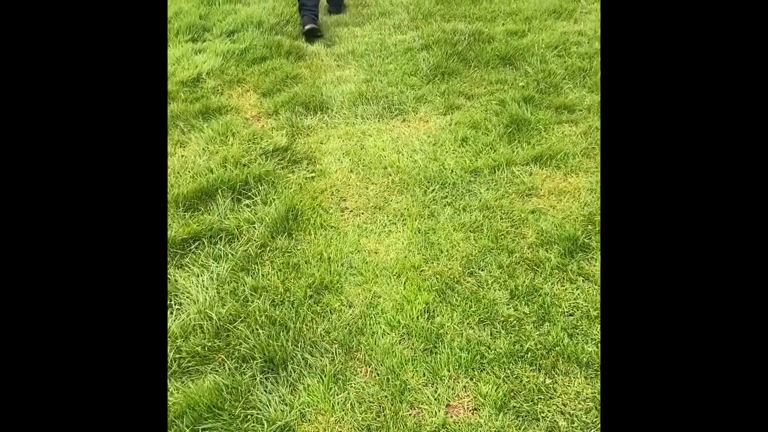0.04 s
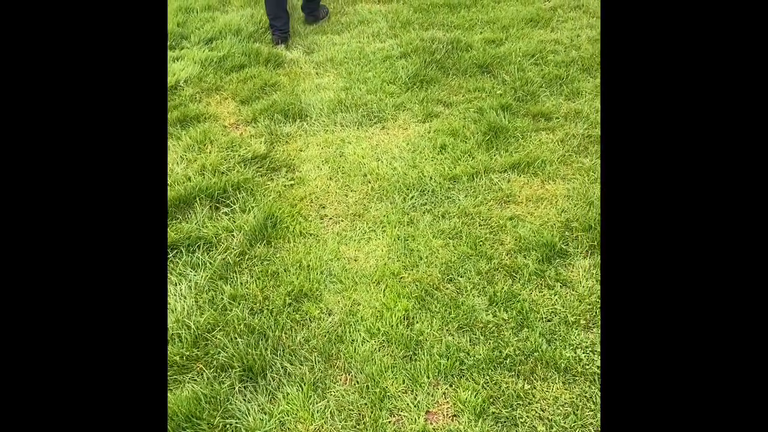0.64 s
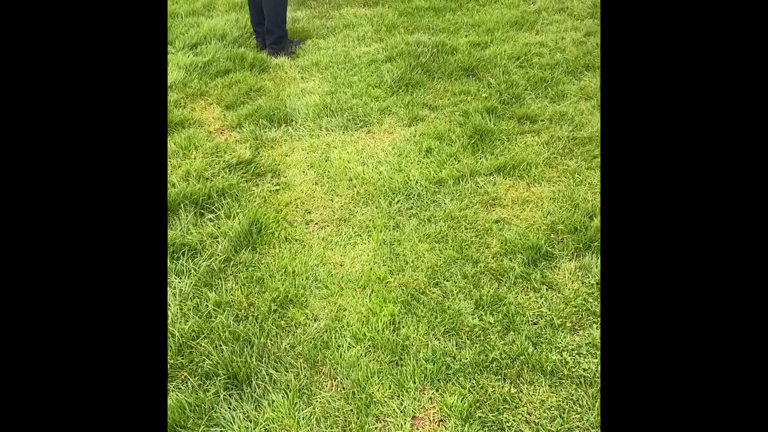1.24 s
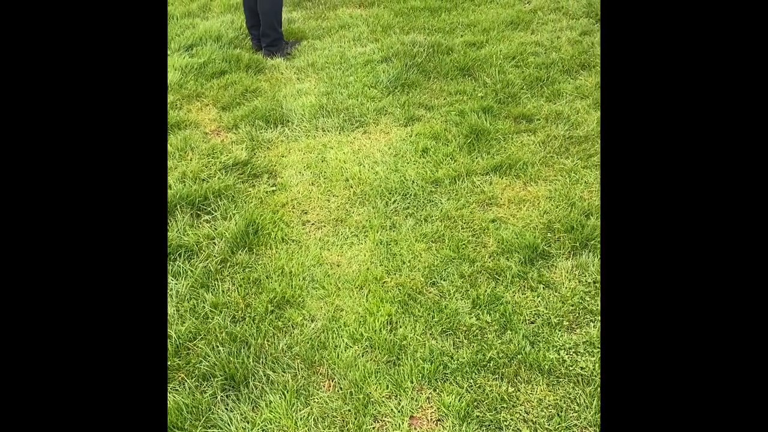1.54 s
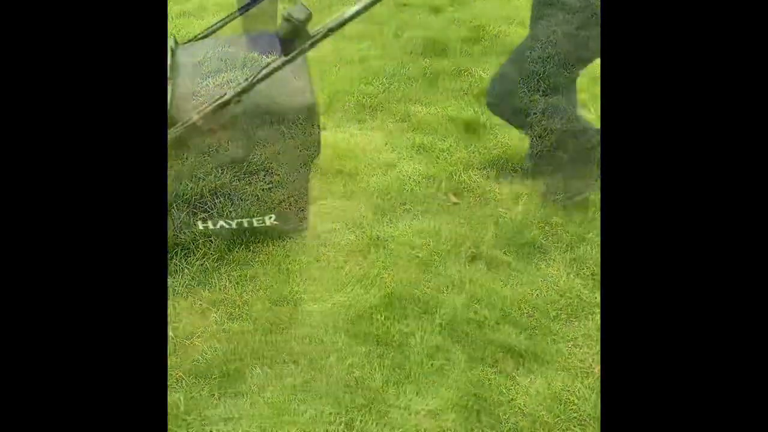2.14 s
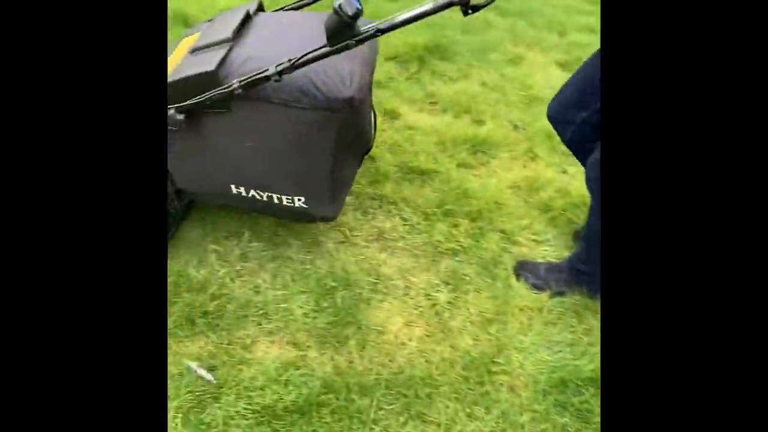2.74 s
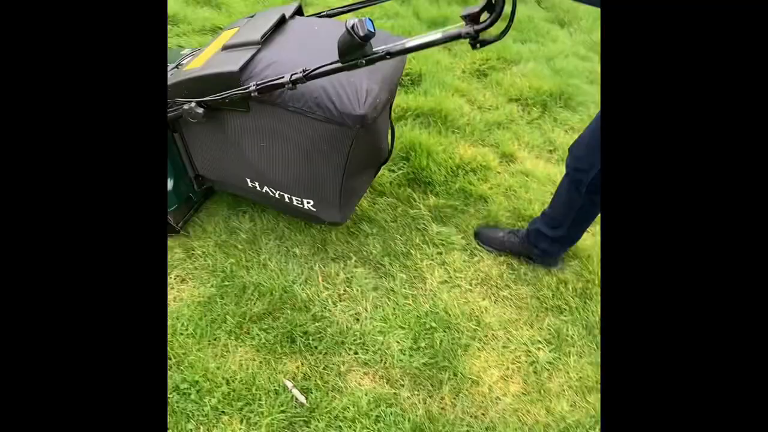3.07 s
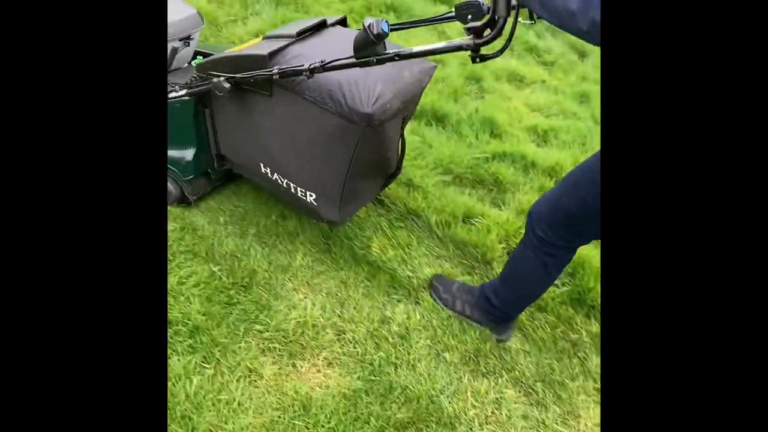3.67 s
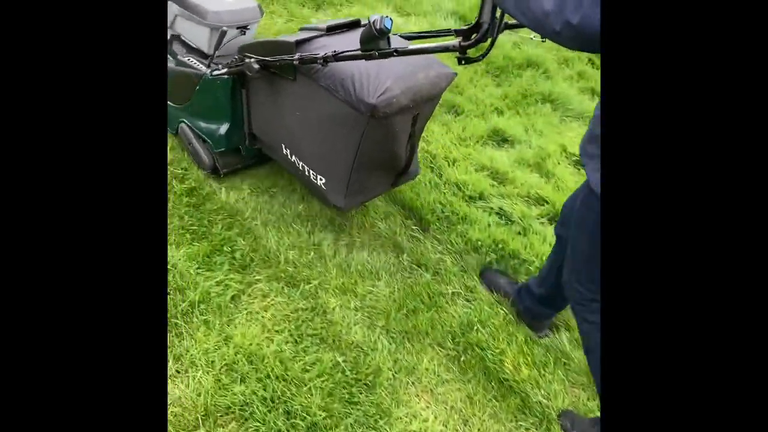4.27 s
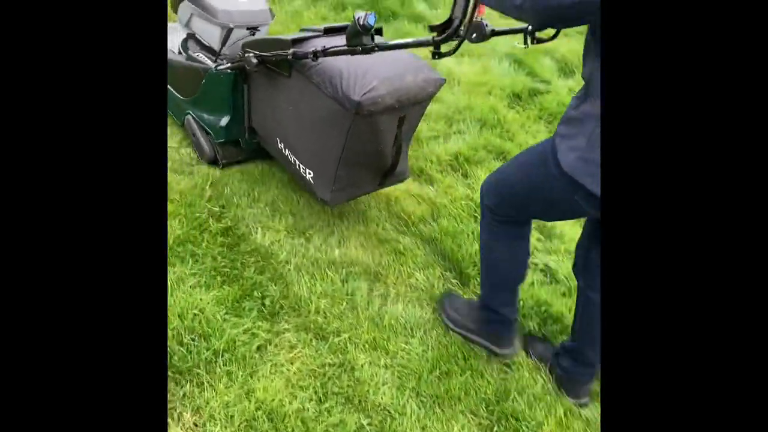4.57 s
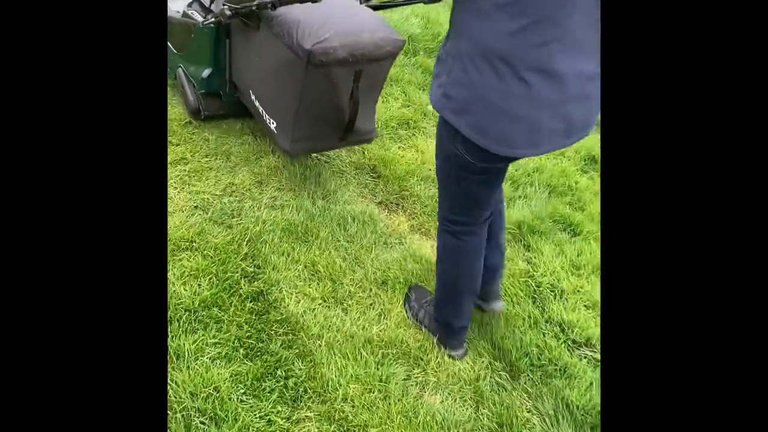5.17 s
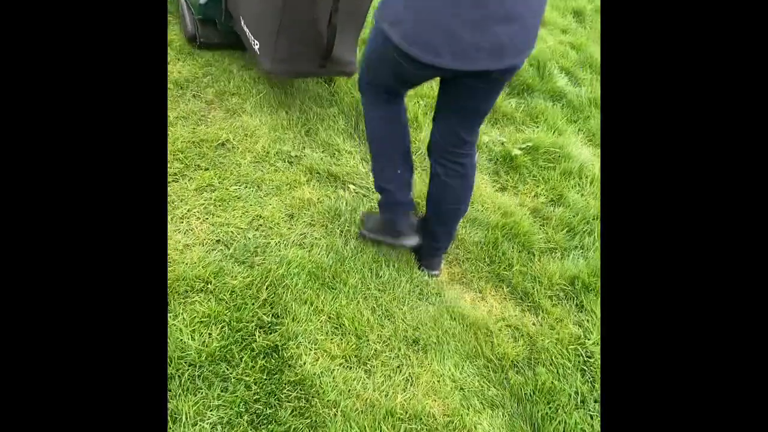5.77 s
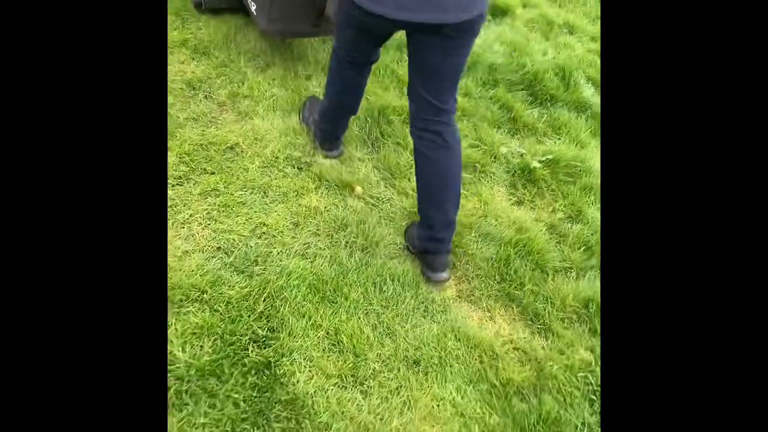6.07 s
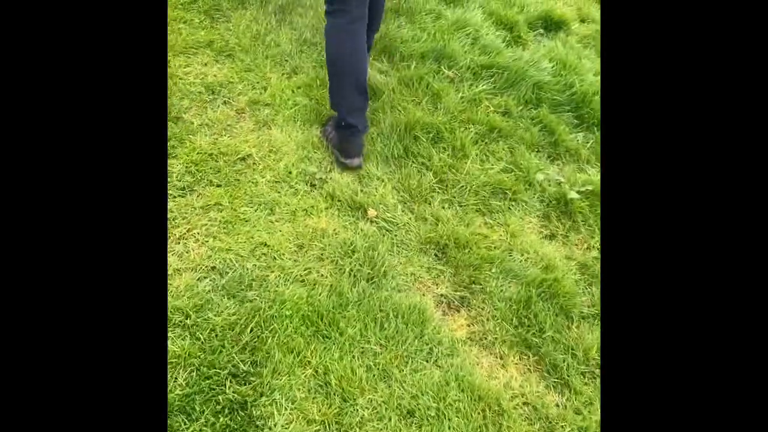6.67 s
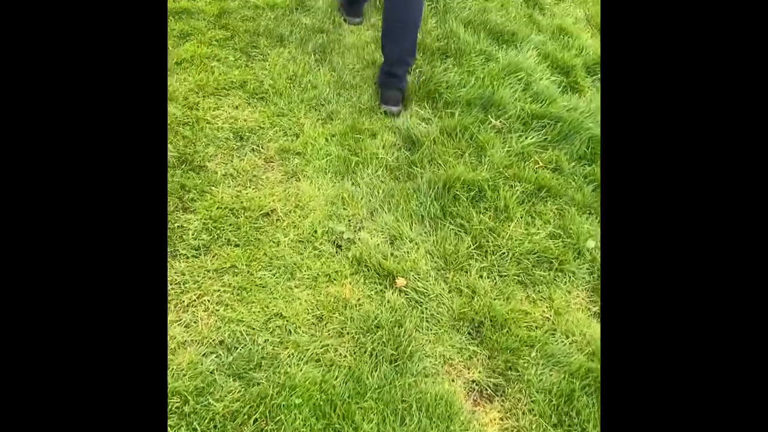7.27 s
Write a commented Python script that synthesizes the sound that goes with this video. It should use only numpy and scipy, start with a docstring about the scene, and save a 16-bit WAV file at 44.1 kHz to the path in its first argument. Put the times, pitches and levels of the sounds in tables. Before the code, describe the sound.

A battery lawnmower hums faintly across an open lawn with no echo, lightly rasping through grass. At about 1.1 seconds it is switched off and its hum falls in pitch with a soft shudder. From about 1.6 seconds a second pass fades in, becoming close and much louder by 2.5 seconds: a steady, slightly wavering low hum with chopped rushing air and a cutting hiss. A thin, rough wheel-drive whine peaks near 3 seconds and returns more faintly around 6.3. The blade rasps through thicker grass around 3, 5 and 6.3 seconds. Swishes of grass, probably footsteps, come irregularly from 2.5 seconds on. Flung bits tick against the deck near 3 seconds and again from 5.8 to 6.6, and tiny bright stalk cracks appear from 3.6 onward. After about 5.5 seconds the mower recedes slightly, still running at the end, around 7.3 seconds.

```python
"""A battery lawnmower on an open lawn, heard through a pair of microphone ports, with no echo.
Far off it hums, is switched off and coasts down; a second pass fades in close by and moves away.
The two blade tips make the hum, chop the air rushing through the deck and cut with a steady hiss.
Over it come swishes of grass, probably footsteps. Stalks crack, flung bits tick against the deck,
and the wheel drive adds a thin whine."""
import sys
import numpy as np
from scipy import signal
from scipy.fft import rfft, irfft
from scipy.io import wavfile

SR = 44100
rng = np.random.default_rng(int(sys.argv[2]) if len(sys.argv) > 2 else 0)


def materialize(psi):
    """Save the field psi as 16-bit PCM at rate SR to the path in sys.argv[1].

    A 1-D psi becomes a single channel; in a 2-D psi each row is a channel.
    """
    bounded = np.clip(np.atleast_2d(psi).T, -1, 1)
    quanta = np.round(bounded * 32767).astype(np.int16)
    wavfile.write(sys.argv[1], SR, quanta)


N = 322812
TIME = np.arange(N) / SR
FREQS = np.maximum(np.arange(N // 2 + 1) * SR / N, 1)
RUN_HZ = 90.7   # blade passes per s of the distant mower under power
CUTOFF_HZ = 15750   # top of the microphone's range

# close by, the blade sags in thick grass and recovers: t/s, blade passes/Hz
BLADE_SPEED = [(1.7, 85.6), (2.23, 87.6), (2.25, 88.3), (2.42, 88.3), (2.45, 87.4), (2.94, 86.6),
               (3.17, 89.1), (3.94, 90.4), (4.17, 91.4), (4.84, 89.2), (5.44, 90.4), (5.72, 89.4),
               (6.55, 89.0), (7.32, 90.3)]


def close_pass():
    """Tones and noise of the mower cutting past the microphone: approaching, side on, then from behind."""
    # the hum's first three harmonics, swelling and fading irregularly: t/s, level/dB
    fundamental = [(1.7, -46), (1.73, -39), (1.98, -32.5), (2.15, -30.5), (2.37, -24), (2.62, -26.5),
                   (3.22, -25), (3.34, -32), (3.42, -24), (3.89, -22), (4.42, -24.5), (4.71, -23),
                   (7.21, -31), (7.32, -30)]
    second = [(1.7, -45.5), (1.84, -36), (2.51, -26.5), (2.59, -34.5), (2.67, -24.5), (2.9, -32.5),
              (2.97, -56), (3.01, -33), (3.14, -23), (4.69, -27.5), (4.81, -37), (5.02, -23), (5.11, -33),
              (5.57, -28), (5.66, -42), (5.78, -21.5), (5.96, -29.5), (6.52, -28.5), (6.8, -38.5),
              (7.01, -27), (7.15, -37), (7.32, -23)]
    third = [(1.7, -50), (1.93, -45), (1.95, -37.5), (2.15, -32.5), (2.23, -48), (2.42, -26.5),
             (2.47, -35.5), (2.65, -28), (2.75, -36), (2.81, -23), (3.11, -28), (3.17, -35), (3.23, -24.5),
             (3.61, -39), (3.67, -20), (3.8, -40), (3.87, -27.5), (3.91, -35.5), (4.02, -31), (4.16, -43),
             (4.2, -23), (4.36, -37.5), (4.39, -24), (4.53, -39.5), (4.64, -24.5), (4.69, -38),
             (4.75, -25.5), (4.84, -32), (5.05, -26), (5.13, -44), (5.19, -27), (5.57, -31), (5.64, -27),
             (5.69, -56), (5.82, -25.5), (5.89, -42.5), (6.32, -31), (6.46, -39), (6.58, -26.5),
             (6.93, -32.5), (6.97, -46), (7.04, -31), (7.16, -48.5), (7.32, -30)]
    # air rush as the mower comes close and moves off: t/s, level/dB
    air_level = [(1.7, -51.5), (1.93, -44), (2.5, -32.5), (3.26, -30.5), (4.03, -32), (5.22, -31),
                 (6.76, -35), (6.99, -34), (7.32, -36.5)]
    # air rush from four angles, each notched differently by the ground bounce: f/Hz, level/dB
    approach = [(55.0, -3), (130.0, 1), (270.0, 5), (430.0, -7), (600.0, -10.5), (780.0, -11.5), (900, -5),
                (1010.0, -1.5), (1120, -5.5), (1400, -9.5), (1900.0, -21), (2130, -18), (2400.0, -18),
                (3500.0, -22.5), (5500.0, -36.5), (9500.0, -38), (15500.0, -51)]
    beside = [(55.0, -8), (130.0, -2), (270.0, 1.5), (380.0, -8.5), (580.0, -9), (750.0, -6), (930.0, -7),
              (1130.0, -5), (1290, -10), (1500, -12.5), (1720.0, -18), (1950, -17), (2700.0, -21),
              (3150, -21), (3500.0, -21.5), (5500.0, -31.5), (9500.0, -31.5), (15500.0, -40)]
    rear_quarter = [(55.0, -10), (250.0, 2.5), (380.0, -13.5), (560.0, -9), (720.0, 0), (920.0, -7),
                    (1150.0, -6.5), (1650.0, -15), (2200, -18.5), (2900.0, -17), (3600.0, -22),
                    (5000.0, -28), (9500.0, -30.5), (15500.0, -41)]
    behind = [(55.0, -8), (250.0, 3), (350.0, -8), (560.0, -12), (720.0, 1), (940.0, -15), (1130.0, -2),
              (1400, -21), (1580.0, -24), (1850, -18.5), (2250.0, -17), (3000.0, -21), (3600.0, -25.5),
              (5500.0, -29), (9500.0, -30.5), (15500.0, -38.5)]
    # when each of the spectra below faces the microphone: t/s, lift of the rush/dB
    aspects = [(2.1, 7), (2.9, 5), (4.1, 5.5), (5.4, 6.5), (6.6, 6)]
    spectra = [approach, beside, beside, rear_quarter, behind]

    (pass_hz,), (air_db,) = in_time(BLADE_SPEED), in_time(air_level)
    passes = np.cumsum(pass_hz) / SR
    levels_db = [in_time(harmonic)[0] + 6.5 for harmonic in (fundamental, second, third)]
    tones = hum(passes, levels_db, waver_db=[.35, 1.0, 1.4], sway=0.16, waver_hz=9)
    tones += from_db(air_db + 2.5) * whine(passes, pass_hz, jitter=0.003, motor_db=0)
    noise = deck_rumble(passes, level_db=air_db - 7.5, gust_db=1.5, gusts_per_s=1.7)
    air = chopped(passes, blade_db=1.17, shaft_db=0, flutter_db=1.22, buzz=0.22)
    air += rattle(level_db=-12.5, per_s=900, ring_s=0.021, low_hz=649.8, high_hz=3494)
    # stalks snap in tiny clumps as a tip sweeps through them, a little before it reaches the chute
    snaps = chopped(passes + 0.22, blade_db=1.0, shaft_db=0.25, flutter_db=0.93)
    snaps *= from_db(1.4 * drift(700))
    grass = grass_envelope(steady_db=2.0, swish_db=0.5)
    times, lifts_db = np.transpose(aspects)
    for spectrum, lift_db, share in zip(spectra, lifts_db, np.eye(len(aspects))):
        rush = from_db(air_db + lift_db) * through_deck(air, spectrum, "rush")
        hiss = grass * through_deck(snaps, spectrum, "hiss")
        noise += np.interp(TIME, times, share) * (rush + hiss)
    fade_in = np.interp(TIME, [1.5, 1.7], [0, 1])
    return fade_in * tones, fade_in * noise


def far_pass():
    """Tones and noise of the distant mower; each layer falls with tip speed by its own law."""
    # deck resonances that the hum glides through: f/Hz, level/dB
    hum_response = [(48, -35), (53, -42), (62, -38), (71, -34), (80, -53), (86, -37), (90, -32.5),
                    (105, -42), (123, -48), (135, -34), (160, -36), (174, -29.5), (181, -31.5),
                    (195, -38.5), (245, -43), (272, -56)]
    # air rush from across the lawn: f/Hz, level/dB
    spectrum = [(55.0, 2), (110, 3), (250.0, 2.5), (340.0, -6.5), (570.0, -8), (700.0, -3.5), (850, -5),
                (990.0, -12), (1200.0, -5), (1300, -9.5), (1400, -14), (1550, -19), (1780.0, -18),
                (2050, -18.5), (2280, -18.5), (2650, -16.5), (2900, -20.5), (3400.0, -19), (3600, -32.5),
                (4400.0, -26.5), (5200.0, -26.5), (6000.0, -26.5), (9500.0, -28), (15500.0, -38)]
    pass_hz = coasting_speed()
    passes = np.cumsum(pass_hz) / SR
    slowing = np.log10(pass_hz / RUN_HZ)   # decades of speed, negative as the blade coasts
    air_db, hiss_db, hum_db = 57 * slowing, 31 * slowing, 61 * slowing
    levels_db = [at_hz(hum_response, k * pass_hz) + hum_db + 7.5 for k in (1, 2, 3)]
    shake = 1 - 6.6 * slowing   # the slower, the less steady
    tones = hum(passes, levels_db, waver_db=[.3 * shake, shake, 2.2], sway=0.13 * shake, waver_hz=18)
    # the overtones sink with the air rush while the motor lines hold their level
    tones += from_db(air_db - 39) * whine(passes, pass_hz, jitter=0.0061, motor_db=-air_db - 3.5)
    air = chopped(passes, blade_db=0.5, shaft_db=-1.05, flutter_db=1.4, buzz=0.33)
    rush = from_db(air_db - 36) * through_deck(air, spectrum, "rush")
    # the slowing blade lets the hiss fall further between its passes
    throb_db = np.interp(pass_hz, [50, 90], [3.5, 1.5])
    throbbing = chopped(passes, blade_db=throb_db, shaft_db=0.46, flutter_db=0.31)
    hiss = from_db(hiss_db - 48) * through_deck(throbbing, spectrum, "hiss")
    fade_out = np.interp(TIME, [1.6, 1.85], [1, 0])
    return fade_out * tones, fade_out * (rush + hiss)


def coasting_speed(switch_off_s=1.095, grip_s=0.067, brake_hz_per_s=92, slowest_hz=39.83):
    """Blade passes per s of the distant mower: steady, until a brake takes hold and slows it evenly."""
    braked_s = grip_s * np.logaddexp(0, (TIME - switch_off_s) / grip_s)
    return np.maximum(RUN_HZ - brake_hz_per_s * braked_s, slowest_hz)


def hum(passes, levels_db, waver_db, sway, waver_hz):
    """The first blade harmonics; the higher ones lag further in phase, and turbulence shakes them more."""
    out = np.zeros(N)
    for k, (db, shake_db) in enumerate(zip(levels_db, waver_db), 1):
        gain = from_db(db + shake_db * drift(waver_hz))
        phase = 2 * np.pi * k * passes - k * k + sway * (k - 1) * drift(5)
        out += gain * np.sqrt(2) * np.sin(phase)
    return out


def whine(passes, pass_hz, jitter, motor_db):
    """Blade overtones and motor lines; nearly in step, they add up to a knock on each turn."""
    # blade overtones as the deck colours them: f/Hz, relative level/dB
    overtones = [(100, -1), (200, 14), (280, 8.5), (350, -6), (450, -6.5), (540, -13), (620, -10),
                 (800, -19), (980, -21), (1100, -12.5), (1600, -30)]
    # shaft imbalance and its knock on the deck: multiple of shaft speed, relative level/dB
    motor = [(1, -21), (3, -24), (5, -12), (7, -25), (9, -23), (23, -9.5), (24, -11), (25, -6), (26, -13),
             (27, -24), (28, -17.5), (29, -10.5)]
    shaken = passes + jitter * drift(9.6)
    lines = [(k, at_hz(overtones, k * pass_hz)) for k in range(4, 16)]
    lines += [(multiple / 2, db + motor_db) for multiple, db in motor]   # two passes to a shaft turn
    out = np.zeros(N)
    for k, db in lines:
        gain = from_db(db + 2.9 * drift(4))
        cycles = k * shaken + .05 * drift(3)
        out += gain * np.cos(2 * np.pi * cycles)
    return out


def chopped(passes, blade_db, shaft_db, flutter_db, buzz=None):
    """Two noises that swell as each tip passes the chute; shaft_db makes the two tips unequal."""
    swell_db = blade_db * np.cos(2 * np.pi * passes) + shaft_db * np.cos(np.pi * passes)
    air = rng.standard_normal((2, N)) if buzz is None else buzzing_air(passes, buzz)
    return air * from_db(swell_db + flutter_db * drift(24))


def buzzing_air(passes, buzz, points=1024):
    """Two noises laid around the shaft; the share buzz (0-1) of each turn comes back on the next."""
    turns = passes / 2
    fresh = rng.standard_normal((2, int(turns.max()) + 12, points))
    repeating = signal.lfilter([1], [1, -buzz], fresh, axis=1)
    settled = repeating[:, 8:].reshape(2, -1)
    return rms_one(np.array([np.interp(turns * points, np.arange(len(side)), side) for side in settled]))


def through_deck(noise, spectrum, part):
    """Colour noise by a spectrum and the deck's rings; keep the "rush" below 6 kHz or the "hiss" above."""
    # resonances of the deck and chute: f/Hz, width/Hz, lift/dB
    deck_rings = [(340, 74, 0), (630, 39, 1.5), (784, 53, 1.5), (1040, 66, 3), (1285, 76, 2.5),
                  (1620, 63, 0.5), (2100, 730, 0), (3150, 75, 5), (4280, 1300, 3), (5100, 120, 3)]
    rings_db = sum(db / (1 + (2 * (FREQS - hz) / width) ** 2) for hz, width, db in deck_rings)
    low_share = 1 / (1 + (FREQS / 6000) ** 8)
    gain = from_db(at_hz(spectrum, FREQS) + rings_db)
    gain *= np.sqrt(low_share if part == "rush" else 1 - low_share)
    gain /= np.sqrt(1 + (48 / FREQS) ** 8)   # low cut at 48 Hz
    power_above_500_hz = np.mean(gain ** 2 * (FREQS > 500))
    return irfft(rfft(rms_one(noise)) * gain, N) / np.sqrt(power_above_500_hz)


def deck_rumble(passes, level_db, gust_db, gusts_per_s):
    """Turbulence under the deck rumbles in gusts, chopped by the blade."""
    gain = from_db(level_db + gust_db * drift(gusts_per_s))
    air = chopped(passes, blade_db=2.1, shaft_db=0.84, flutter_db=0.87)
    return gain * rms_one(band(air, 175, 370))


def grass_envelope(steady_db, swish_db):
    """Strength of the grass noise: swishes, probably footsteps, over the steady cutting hiss."""
    # steady cutting hiss: t/s, level/dB
    steady_hiss = [(1.6, -68), (1.9, -54.5), (2.6, -40), (3.59, -44.5), (6.2, -41), (6.86, -45),
                   (7.32, -42)]
    # swishes of grass: peak t/s, build-up/s, peak level/dB
    swishes = [(2.46, 0.06, -34.5), (2.62, 0.11, -44), (2.80, 0.034, -36), (2.94, .05, -43),
               (3.12, 0.026, -55), (3.34, 0.055, -36), (3.63, 0.042, -42.5), (3.94, 0.085, -41.5),
               (4.65, 0.073, -39.5), (4.79, 0.079, -38.5), (4.96, 0.17, -35), (5.63, 0.083, -37.5),
               (5.83, 0.14, -33.5), (6.14, 0.058, -37), (6.26, 0.039, -37), (6.47, 0.032, -42),
               (6.63, 0.024, -40), (6.73, 0.1, -39), (7.31, 0.037, -36)]
    fall_s = 0.049   # each swish dies away quickly
    hiss_db, = in_time(steady_hiss)
    swish_power = sum((from_db(db + swish_db) * swell(s, rise_s, fall_s)) ** 2
                      for s, rise_s, db in swishes)
    return np.sqrt(from_db(hiss_db + steady_db) ** 2 + swish_power)


def rasp(grain_db, bite_db, db_per_decade):
    """Each tip tears through the stalks in a buzzing bite that rings in the deck and dies as it slows."""
    # stretches of thicker grass: middle t/s, half length/s, peak level/dB, ring f/Hz, width/Hz
    thick_grass = [(0.74, 0.55, -43.5, 1210, 260), (0.94, 0.67, -53, 1870, 200),
                   (1.07, 0.58, -43.5, 2660, 440), (0.8, 0.57, -45, 3090, 190),
                   (2.97, 0.47, -31, 1266, 180), (3.8, 0.83, -46, 3130, 250), (4.85, 0.24, -35, 1340, 260),
                   (5.15, 0.89, -40, 2900, 500), (6.3, 0.65, -44, 2810, 410), (6.3, 0.79, -40.5, 1145, 200)]
    is_far = TIME < 1.65   # then the close pass takes over
    far_hz, (close_hz,) = coasting_speed(), in_time(BLADE_SPEED)
    passes = np.where(is_far, np.cumsum(far_hz), np.cumsum(close_hz)) / SR
    force = np.where(is_far, from_db(db_per_decade * np.log10(far_hz / RUN_HZ)), 1)
    tearing = chopped(passes, blade_db=bite_db, shaft_db=1.5, flutter_db=1.8, buzz=.55)
    tearing *= from_db(grain_db * drift(150))
    out = np.zeros((2, N))
    for s, half_s, db, hz, width_hz in thick_grass:
        ring = rms_one(band(tearing, hz - width_hz / 2, hz + width_hz / 2))
        out += from_db(db) * swell(s, half_s, half_s) * ring
    return force * out


def flung_bits():
    """Bits thrown by the blade tick against the deck."""
    # impacts: t/s, relative peak level/dB, ring f/Hz
    impacts = [(2.8024, -39, 8030), (3.1128, -32.5, 4200), (5.8344, -35, 8630), (6.2174, -37, 9640),
               (6.2507, -40, 7470), (6.3485, -44, 3740), (6.6094, -41, 7600)]
    return ticks(impacts, decay_s=0.0064, gain_db=12)


def snapping_stalks(level_db, snaps_per_s, spread_db):
    """Tiny bright snaps of stalks, thicker and louder in every swish, and a few sharp cracks."""
    # single stalks cracking: t/s, relative peak level/dB
    cracks = [(3.6105, -35), (3.9745, -30), (4.9375, -25), (5.617, -31), (5.809, -28), (6.3082, -31),
              (6.3481, -25), (6.3885, -32), (6.7003, -32), (6.7353, -29), (7.1019, -32), (7.168, -34),
              (7.2865, -33)]
    strength = rms_one(grass_envelope(steady_db=4.0, swish_db=3.0))
    snapped = rng.random(N) < snaps_per_s * strength / SR
    sizes = from_db(spread_db * np.minimum(rng.exponential(1, N), 4)) * rng.standard_normal((2, N))
    snaps = snapped * sizes * strength ** .7
    crackle = from_db(level_db) * rms_one(band(snaps + 1e-18, 12000, CUTOFF_HZ))
    return crackle + ticks([(s, db, 14500) for s, db in cracks], decay_s=0.001, gain_db=5)


def rattle(level_db, per_s, ring_s, low_hz, high_hz):
    """Clippings and loose panels ping briefly, each at a pitch and strength of its own."""
    age = np.arange(SR // 16) / SR
    envelope = np.exp(-age / ring_s) - np.exp(-age / 0.0049)
    out = np.zeros((2, N + len(age)))
    for when, pitch, size, side in rng.random((int(per_s * N / SR), 4)):
        hz = low_hz + pitch * (high_hz - low_hz)
        ping = -np.log(1 - size) * envelope * np.sin(2 * np.pi * hz * age)
        start = int(when * N)
        out[:, start:start + len(age)] += np.outer([1, np.sign(side - .5)], ping)
    return from_db(level_db) * rms_one(out[:, :N])


def wheel_drive(gain_db, meshes_per_turn):
    """A thin, rough gear whine, geared to the shaft, whose pitch trembles with the load."""
    # gear whine: t/s, level/dB, tremble/Hz
    gear_whine = [(1.55, -100, 18), (1.65, -58, 15), (2.1, -51, 25), (2.9, -35.5, 58.6), (3.6, -49, 48),
                  (4.5, -70, 40), (5.6, -45, 20), (6.3, -40.5, 13), (7.32, -55, 14)]
    (pass_hz,), (db, tremble_hz) = in_time(BLADE_SPEED), in_time(gear_whine)
    hz = meshes_per_turn * pass_hz / 2 + tremble_hz * drift(70)
    return from_db(db + gain_db + 2.9 * drift(45)) * np.sin(2 * np.pi * np.cumsum(hz) / SR)


def braking_rumble(level_db, middle_s, half_s):
    """The distant deck shudders while the brake holds the blade."""
    shudder = rms_one(band(rng.standard_normal((2, N)), 130, 330))
    return from_db(level_db) * swell(middle_s, half_s, half_s) * shudder


def spin_down(tremble_hz):
    """The faint whine of the distant motor running down."""
    # falling whine: t/s, f/Hz, level/dB
    glide = [(1.3, 9900, -83), (1.45, 9350, -74), (1.6, 8850, -66), (1.75, 8400, -75), (1.9, 8300, -88)]
    hz, db = in_time(glide)
    gain = from_db(db + 2.5 * drift(20))
    return gain * np.sin(2 * np.pi * np.cumsum(hz + tremble_hz * drift(90)) / SR)


def microphone_ports(tones, noise):
    """The left port loses bass and is shifted in phase; it shares only part of the right's noise."""
    # left port against right: f/Hz, level/dB
    balance = [(50, -8), (88, -17), (178, -23), (215, -20), (268, -16), (330, -4), (450, 0.05), (1200, 0),
               (2800, 0.27), (15000, 0)]
    # lead of the left port: f/Hz, phase/rad
    lead = [(90, -1.83), (180, -2), (270, -2.5), (400, -3.5), (950, -3.6), (1400, -4.05), (1750, -4.7),
            (2200, -4.1), (2750, -4.3), (3200, -3.9), (3900, -4.5), (5300, -3.25), (6100, -3.05),
            (7800, -0.2), (9200, .15), (11200, 2.8), (12400, 3.4), (14200, 6.2)]
    # noise common to both ports: f/Hz, likeness (0-1)
    likeness = [(50, .4), (210, 0.55), (350, 0.92), (900, 0.975), (1400, 0.94), (1750, 0.78), (2150, .88),
                (2700, .72), (3050, 0.89), (3600, .68), (4600, 0.74), (5800, .95), (7000, 0.7),
                (8400, 0.95), (10200, .72), (11700, .96), (13300, .6), (15000, 0.95)]
    alike = at_hz(likeness, FREQS)
    shared, own = rfft(noise)
    left = rfft(tones) + alike * shared + np.sqrt(1 - alike ** 2) * own
    left *= from_db(at_hz(balance, FREQS)) * np.exp(1j * at_hz(lead, FREQS))
    return np.array([irfft(left, N), tones + noise[0]])


def ticks(rows, decay_s, gain_db):
    """Short bright noise bursts, each around its own pitch."""
    out = np.zeros((2, N))
    age = np.arange(SR // 20) / SR
    for s, db, hz in rows:
        burst = rng.standard_normal((2, len(age))) * np.exp(-age / decay_s)
        tick = band(burst, hz * 0.92, hz * 1.08)
        tick *= from_db(db + gain_db) / np.abs(tick).max()
        start = int(s * SR)
        out[:, start:start + len(age)] += tick[:, :N - start]
    return out


def swell(s, rise_s, fall_s):
    """A bell-shaped envelope of height 1 at time s."""
    return np.exp(-((TIME - s) / np.where(TIME < s, rise_s, fall_s)) ** 2)


def drift(rate):
    """Smooth random wander of spread 1 that changes about rate times a second."""
    step = max(1, int(SR / (8 * rate)))
    slow = np.convolve(rng.standard_normal(N // step + 8), np.hanning(7), "valid")
    return np.interp(np.arange(N), step * np.arange(len(slow)), rms_one(slow))


def band(x, low_hz, high_hz):
    """Butterworth band-pass."""
    return signal.sosfilt(signal.butter(2, [low_hz, high_hz], "band", fs=SR, output="sos"), x)


def in_time(rows):
    """Each column after a table's times, at every sample."""
    s, *columns = np.transpose(rows)
    return [np.interp(TIME, s, column) for column in columns]


def at_hz(points, hz):
    """Read a table on a log-frequency axis."""
    f, value = np.transpose(points)
    return np.interp(np.log(hz), np.log(f), value)


def from_db(db):
    """Decibels to gain."""
    return np.exp(np.asarray(db) * np.log(10) / 20)


def rms_one(x):
    """Scale to unit power."""
    return x / np.sqrt(np.mean(x ** 2) + 1e-20)


def scene():
    """The far pass, then the close one, reaching the microphone across the open lawn."""
    far_tones, far_noise = far_pass()
    close_tones, close_noise = close_pass()
    tones = far_tones + close_tones
    tones += wheel_drive(gain_db=3.0, meshes_per_turn=49)
    tones += spin_down(tremble_hz=80)
    noise = far_noise + close_noise
    noise += braking_rumble(level_db=-43, middle_s=1.4, half_s=.25)
    noise += rasp(grain_db=2, bite_db=8, db_per_decade=80)
    noise += flung_bits()
    noise += snapping_stalks(level_db=-55, snaps_per_s=1400, spread_db=2.2)
    return microphone_ports(tones, noise)


def record(dry):
    """A steep low-pass cuts the top of both channels."""
    return signal.sosfilt(signal.ellip(12, .1, 90, CUTOFF_HZ, fs=SR, output="sos"), dry)


dry = scene()
out = record(dry)
materialize(out)
```